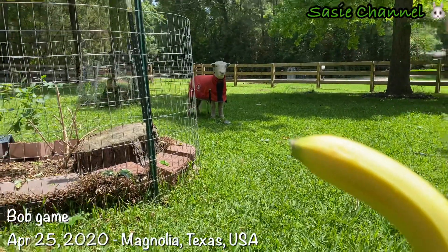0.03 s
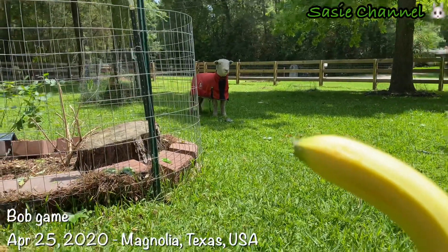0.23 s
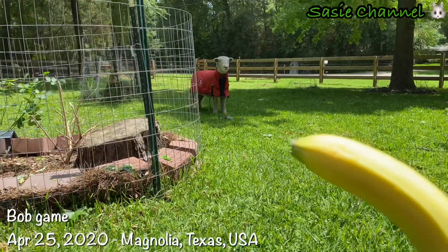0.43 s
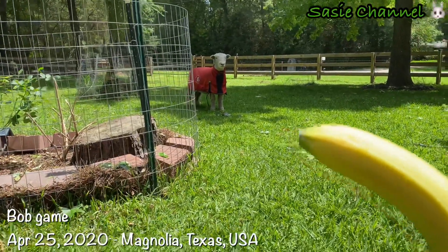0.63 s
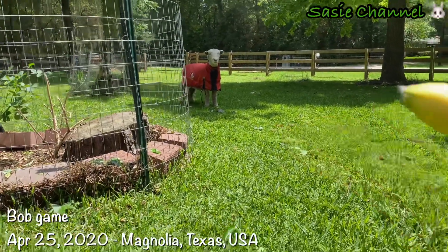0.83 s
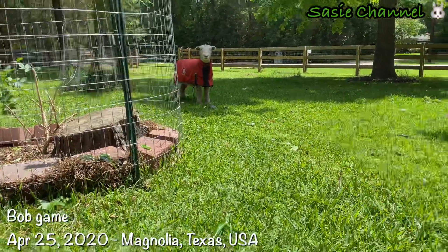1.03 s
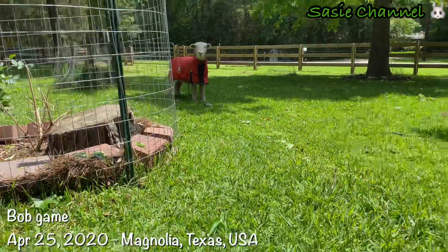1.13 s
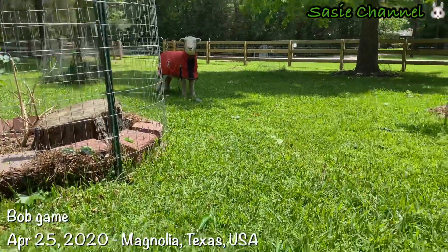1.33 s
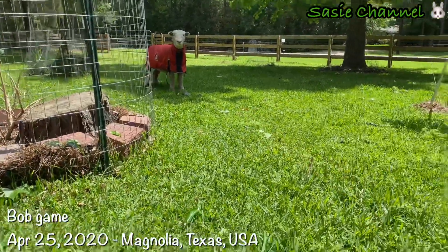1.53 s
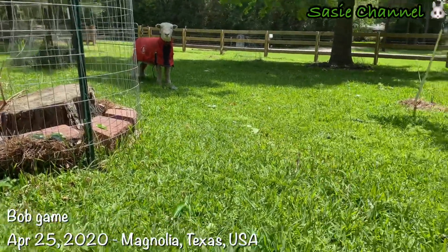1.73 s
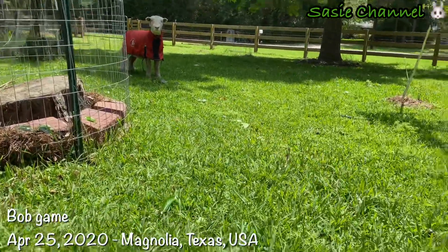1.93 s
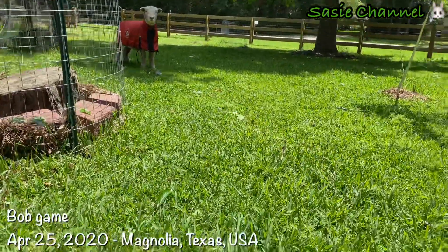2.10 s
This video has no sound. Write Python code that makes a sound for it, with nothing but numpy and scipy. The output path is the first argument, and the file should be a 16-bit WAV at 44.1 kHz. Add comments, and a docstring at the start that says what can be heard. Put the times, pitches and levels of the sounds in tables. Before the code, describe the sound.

One low sheep bleat sinks into a fading growl, with soft grass crunches nearby.

```python
"""A ram's moan in a grassy yard

Off to the left sounds one low moan, like a closed-mouth bleat or a far motor. It opens on ragged pulses,
holds a clear tone coloured by throat and nose, then sinks into a slow throbbing growl and dies away.
Close by, grass swishes and crunches and a few stalks snap. Behind it lie a faint rumble,
distant birds and a few thin, high whines."""
import sys
import numpy as np
from scipy import signal
from scipy.fft import rfft, irfft, next_fast_len
from scipy.io import wavfile
from scipy.ndimage import map_coordinates

SR = 44100
rng = np.random.default_rng(int(sys.argv[2]) if len(sys.argv) > 2 else 0)


def generate_wav(signal):
    """Clip the signal to [-1, 1] and save it as 16-bit WAV at the path in sys.argv[1]."""
    frames = np.transpose(np.atleast_2d(signal))
    scaled = np.clip(frames, -1, 1) * 32767
    pcm = np.round(scaled).astype(np.int16)
    wavfile.write(sys.argv[1], SR, pcm)


N = 95476
TIME = np.arange(N) / SR
SPLIT = np.array([[.5], [-.5]])  # shares a left-minus-right difference between the channels


def amp(db):
    """Decibels to gain."""
    return 10 ** (np.asarray(db) / 20)


def unit(x):
    """Scale to rms 1."""
    return x / np.sqrt(np.mean(x ** 2) + 1e-20)


def panned(db):
    """Stereo gains for a left-minus-right level difference."""
    return amp(db * SPLIT)


def along(points, hz):
    """Read (frequency, value) points on a log frequency axis."""
    f, v = np.transpose(points)
    return np.interp(np.log(hz + 1), np.log(f + 1), v)


def curves(rows):
    """One automation curve for each column after the time."""
    times, *columns = np.transpose(rows)
    return [np.interp(TIME, times, column) for column in columns]


def wobble(rate):
    """A smooth random curve, rate knots a second."""
    return map_coordinates(rng.standard_normal(4096), [TIME * rate], mode="wrap")


def burst(peak_s, rise_s, fall_s):
    """An envelope that swells to 1 at peak_s and dies away."""
    t = TIME - peak_s
    return np.exp(np.minimum(t / rise_s, -t / fall_s))


def filtered(x, response):
    """x through a complex frequency response."""
    size = next_fast_len(N + SR // 2)
    return irfft(rfft(x, size) * response(np.fft.rfftfreq(size, 1 / SR)), size)[..., :N]


def resonant(x, hz, width_hz):
    """x through a steep band-pass, at rms 1."""
    return unit(filtered(x, lambda f: (1j * f * width_hz / (hz * hz - f * f + 1j * f * width_hz)) ** 2))


def ringing(x, colour):
    """x rings a minimum-phase filter of the given colour with a softened top, at rms 1."""
    size = 8192
    hz = np.fft.rfftfreq(size, 1 / SR)
    gain = amp(along(colour, hz)) / (1 + (hz / colour[-1][0]) ** 2)
    cepstrum = irfft(np.log(gain + 1e-6))
    cepstrum[1:size // 2] *= 2  # folded forward, so the ring follows the hit
    cepstrum[size // 2 + 1:] = 0
    impulse = irfft(np.exp(rfft(cepstrum)))
    return unit(signal.fftconvolve(x, impulse)[:N])


def stereo(mid, side, side_db):
    """Mid and side to left and right, at rms 1."""
    return unit(np.array([mid + amp(side_db) * side, mid - amp(side_db) * side]))


def rush(colour, side_db, grain_db):
    """Grainy stereo noise of rms 1."""
    pair = rng.standard_normal((2, N)) * amp(grain_db * wobble(700))
    mid, side = filtered(pair, lambda hz: amp(along(colour, hz)))
    return stereo(mid, side, side_db)


def crackle(colour, side_db, breaks_per_s=450, share=.55):
    """Many tiny breaks of random size over a rush; share is their part of the power."""
    breaks = (rng.random(N) < breaks_per_s / SR) * rng.standard_normal((2, N))
    mid, side = [ringing(x, colour) for x in breaks]
    grains = stereo(mid, side, side_db)
    return np.sqrt(share) * grains + np.sqrt(1 - share) * rush(colour, side_db, grain_db=2.5)


def throbs(rate_hz, scatter, size_db, turbulence):
    """Uneven pulses with turbulence between them."""
    turns = np.cumsum(rate_hz * (1 + scatter * wobble(30))) / SR
    pulses = np.diff(np.floor(turns), prepend=0) * amp(size_db * wobble(39.06))
    return unit(pulses) + turbulence * rng.standard_normal(N)


def rumble():
    """A low, gently wavering outdoor bed that leans left."""
    # spectrum of the bed: f/Hz, level/dB
    colour = [(20, -42), (35, -22), (54, 19), (75, -8), (120, -18), (250, -7.5), (600, -45), (2000, -59)]
    # its slow swell: t/s, level/dB
    swell = [(0, -57), (.7, -54), (1.2, -56), (1.6, -53), (2.16, -57.5)]
    bed = rush(colour, side_db=1.0, grain_db=-4)
    return bed * amp(curves(swell)[0] + wobble(4.2)) * panned(6.5)


def bird(blur=.013):
    """A far bird whistles short glides, blurred in pitch."""
    # whistles: t/s, length/s, start f/Hz, end f/Hz, level/dB
    whistles = [(0.169, 0.17, 3070, 2820, -62.5), (0.948, 0.041, 2460, 2320, -63.5),
                (1.01, 0.047, 2500, 2770, -65.5), (1.989, 0.11, 2389, 2050, -69)]
    out = np.zeros(N)
    for start, length, start_hz, end_hz, db in whistles:
        progress = np.clip((TIME - start) / length, 0, 1)
        hz = (start_hz + (end_hz - start_hz) * progress) * (1 + blur * wobble(400))
        out += amp(db) * np.sin(np.pi * progress) * np.sin(2 * np.pi * np.cumsum(hz) / SR)
    return out


def far_calls():
    """Short calls, smeared by the trees into narrow bands of noise."""
    # calls: t/s, length/s, centre f/Hz, width/Hz, level/dB
    calls = [(1.075, 0.047, 1620, 450, -56), (1.333, 0.085, 3970, 350, -61), (1.644, .085, 1040, 128, -65),
             (1.975, 0.058, 1920, 300, -66.5), (2.133, 0.066, 1970, 350, -60.5)]
    out = np.zeros(N)
    for start, length, hz, width_hz, db in calls:
        progress = np.clip((TIME - start) / length, 0, 1)
        out += amp(db) * np.sin(np.pi * progress) * resonant(rng.standard_normal(N), hz, width_hz)
    return out


def whines(edge_s=.0022, left_lead_rad=.28):
    """Brief steady tones at the top of the treble, slightly out of phase between the channels."""
    # thin tones: t/s, length/s, f/Hz, level/dB
    tones = [(-.045, .085, 13450, -53), (.932, .085, 12462, -52), (1.015, .085, 14524, -50),
             (1.445, .085, 13450, -55)]
    out = np.zeros((2, N))
    for start, length, hz, db in tones:
        gate = np.clip(np.minimum(TIME - start, start + length - TIME) / edge_s, 0, 1)
        out += amp(db) * gate * np.sin(2 * np.pi * hz * TIME + left_lead_rad * SPLIT)
    return out


def grass_swish(gain_db=5, flutter_db=.8):
    """Blades swish in uneven, fluttering waves."""
    # spectrum of the swish: f/Hz, level/dB
    colour = [(250, 15.5), (600, 15), (1500, 7.5), (2600, 5), (4200, 7), (6300, 6), (8000, -1.5),
              (10000, 6.5), (12000, -5), (14500, 9.5), (15500, -23)]
    # its waves: t/s, level/dB before gain_db
    waves = [(0, -58.5), (.06, -59.5), (.14, -67), (.25, -60.5), (.37, -65.5), (.41, -60.5), (.47, -63),
             (.52, -56.5), (.57, -57.5), (.66, -64), (.76, -57.5), (.84, -62.5), (.93, -61), (1.02, -66.5),
             (1.1, -57.5), (1.17, -58.5), (1.245, -52.5), (1.32, -60.5), (1.37, -58), (1.43, -55),
             (1.46, -61), (1.59, -60.5), (1.635, -66), (1.68, -58.5), (1.72, -62.5), (1.82, -56.5),
             (1.885, -51), (1.915, -59), (1.96, -59.5), (2.03, -67.5), (2.1, -64), (2.16, -65)]
    blades = rush(colour, side_db=-1.5, grain_db=1.5)
    return blades * amp(curves(waves)[0] + gain_db + flutter_db * wobble(59.84))


def grass_crush():
    """Crushed grass crackles in scuffs and short, dull crunches, a little to the right."""
    # scuffs: peak t/s, level/dB, rise/s, fall/s
    scuffs = [(1.091, -60, 0.0076, 0.013), (1.245, -58.5, 0.021, 0.057), (1.41, -61, 0.035, 0.15),
              (1.69, -58.5, 0.033, 0.022), (1.868, -52, 0.037, 0.044), (2.17, -59, 0.022, .03)]
    # crunches: peak t/s, level/dB
    crunches = [(1.211, -55), (1.298, -52), (1.433, -51), (1.584, -57), (1.702, -56), (1.952, -52)]
    # spectrum of the crackle: f/Hz, level/dB
    colour = [(100, -30), (300, 2), (550, 1.5), (1100, 8), (1700, 5), (2800, 4.5), (5000, -12.5),
              (9000, -13)]
    pressure = amp(-65.5) * np.interp(TIME, (.8, 1.05), (0, 1))  # faint crushing between scuffs
    pressure += sum(amp(db) * burst(s, rise, fall) for s, db, rise, fall in scuffs)
    pressure += sum(amp(db) * burst(s, rise_s=.00069, fall_s=.0031) for s, db in crunches)
    return crackle(colour, side_db=8) * pressure * panned(-3)


def stalk_snaps(rise_s=.00069):
    """Stalks break in bright ticks of noise, each with its own treble edge."""
    # snaps: peak t/s, level/dB, decay/s, low-pass f/Hz
    snaps = [(1.481, -51, 0.0024, 12000), (1.499, -39.5, 0.0028, 12200), (1.751, -47.5, 0.0067, 10300),
             (1.795, -43.5, .003, 7540), (1.8, -43.5, 0.01, 8040)]
    # spectrum of the crack: f/Hz, level/dB
    colour = [(500, -30), (2500, -19), (4200, 5.5), (6300, 4.5), (8500, 1), (15000, 17.5)]
    crack = rush(colour, side_db=-1.5, grain_db=1.0)
    out = np.zeros((2, N))
    for peak_s, db, decay_s, top_hz in snaps:
        dulled = unit(filtered(crack, lambda f: 1 / (1 + (f / top_hz) ** 8)))
        out += amp(db) * burst(peak_s, rise_s, decay_s) * dulled
    return out


def rasp():
    """Quick, ragged pulses give the moan its rough opening."""
    # envelope of the rasp: t/s, level/dB
    envelope = [(0, -29), (.06, -31), (.15, -30.5), (.195, -35), (.235, -31), (.28, -48), (.335, -30.5),
                (.38, -48), (.7, -41.5), (.8, -47.5), (1.2, -50.5), (1.5, -84)]
    # the resonances its pulses ring: f/Hz, level/dB
    colour = [(40, -22), (75, -10), (105, 0), (160, -0.5), (210, -8), (265, 1.5), (350, 2.5), (460, -19.5),
              (530, -12), (580, 0), (670, -15), (1100, -28), (1600, -104)]
    pulses = throbs(rate_hz=44, scatter=.2, size_db=3.0, turbulence=1.0)
    return ringing(pulses, colour) * amp(curves(envelope)[0])


def growl(rate_hz=31.5, slowing_hz_per_s=5.5, darken_s=(.66, 1.32)):
    """The moan's tail throbs, ever slower and darker."""
    # envelope of the growl: t/s, level/dB
    envelope = [(.74, -58), (.79, -39.5), (.86, -38), (.95, -41), (1.1, -41), (1.22, -44), (1.35, -45),
                (1.52, -46.5), (1.67, -47), (1.76, -56.5), (1.94, -55), (2.03, -53.5), (2.16, -61)]
    # its early resonances: f/Hz, level/dB
    early = [(35, -22), (70, -6.5), (110, -3), (170, -1.5), (240, -16.5), (300, -12), (360, -4.5),
             (450, -21.5), (600, -27), (1000, -61)]
    # its late, darker resonances: f/Hz, level/dB
    late = [(30, -41.5), (60, 4), (90, -4.5), (150, -3), (220, -14), (350, -15), (500, -26.5),
            (1000, -60.5)]
    pulses = throbs(rate_hz - slowing_hz_per_s * TIME, scatter=.0293, size_db=.5, turbulence=.5)
    dark = np.interp(TIME, darken_s, (0, 1))
    tail = (1 - dark) * ringing(pulses, early) + dark * ringing(pulses, late)
    return tail * amp(curves(envelope)[0])


def hoarseness(phase, nasal_hz=1930, width_hz=170, flutter_db=2.5):
    """Air puffs once a cycle through the throat and, with the buzz, sets the nasal resonance ringing."""
    # uneven bursts of nasal ring: t/s, level/dB
    nasal_bursts = [(0, -70), (.05, -61), (.21, -71), (.24, -58), (.3, -63), (.335, -57), (.358, -67),
                    (.375, -52), (.404, -64), (.434, -56), (.485, -68), (.505, -60), (.536, -71),
                    (.564, -62), (.59, -69), (.654, -59), (.71, -75), (.75, -65), (.78, -73), (.805, -61),
                    (.87, -77), (1.2, -100)]
    # envelope of the hoarse air: t/s, level/dB
    breath_envelope = [(0, -56), (.19, -57), (.27, -50), (.36, -50), (.47, -56), (.56, -55), (.75, -56),
                       (.82, -65), (1.0, -76), (1.3, -100)]
    # its spectrum: f/Hz, level/dB
    breath_colour = [(380, -32), (500, -17), (700, -1), (880, 2), (1050, 4), (1300, -7), (1500, -6),
                     (1750, -24), (2300, -26), (3000, -67)]
    air = rng.standard_normal(N) * (1 + np.cos(phase))
    buzz = sum(np.cos(k * phase) for k in range(9, 16))
    nasal = unit(resonant(buzz, nasal_hz, width_hz) + resonant(air, nasal_hz, width_hz))
    nasal *= amp(curves(nasal_bursts)[0] + flutter_db * wobble(109.7))
    breath = unit(filtered(air, lambda f: amp(along(breath_colour, f))))
    return nasal + breath * amp(curves(breath_envelope)[0])


def overtones(phase, pitch_hz, closing_s=(.54, .46), flutter_db=2, ragged_rad=.02):
    """Harmonics 4 to 10 slide through the throat's resonances, which narrow as the mouth closes."""
    # broad resonance near 1 kHz, mouth open: f/Hz, gain/dB
    throat_open = [(550, -4), (720, -4), (900, -3), (1090, -4), (1270, -8), (1450, -16), (1700, -21),
                   (2300, -36), (3000, -70)]
    # narrower peaks, mouth closing: f/Hz, gain/dB
    throat_closed = [(500, -6), (630, -2), (790, -11), (930, -2), (1000, -2), (1120, -13), (1300, -15),
                     (1600, -26), (3000, -70)]
    # drive of each harmonic into the throat: t/s, level/dB
    drive = [(0, -57), (.19, -58), (.26, -52), (.34, -52), (.385, -46), (.45, -46), (.5, -49), (.56, -49.5),
             (.72, -51), (.8, -64), (1.0, -78), (1.3, -103)]
    closed = np.interp(TIME, closing_s, (0, 1))
    out = np.zeros(N)
    for k in range(4, 11):
        db = (1 - closed) * along(throat_open, k * pitch_hz) + closed * along(throat_closed, k * pitch_hz)
        gain = np.sqrt(2) * amp(db + flutter_db * wobble(58.6))
        out += gain * np.sin(k * (phase + ragged_rad * wobble(150)))
    return out * amp(curves(drive)[0])


def voice(jitter=.006, shake_rad=.16, shimmer_db=.7, shake_db=3.5):
    """Three clear partials that shake where the moan is gruff, with overtones and hoarseness on top."""
    # glide of the second partial, an octave above the fundamental: t/s, f/Hz
    glide = [(0, 354), (.08, 360), (.16, 342), (.2, 346), (.255, 367), (.295, 363), (.325, 352),
             (.355, 364), (.41, 362), (.475, 336), (.52, 327), (.57, 325), (.65, 315), (.72, 302),
             (.8, 273), (.9, 239), (1.0, 205), (1.11, 165), (1.27, 151), (1.4, 131), (1.9, 89)]
    # how hard the partials shake: t/s, roughness/0-1
    roughness = [(0, .8), (.2, .7), (.27, .4), (.325, .9), (.37, .2), (.44, .2), (.48, .5), (.55, .3),
                 (.7, .35), (.78, .7), (.86, 1)]
    # envelopes of the partials: t/s, first level/dB, second level/dB, third level/dB
    envelopes = [(0, -29, -37, -41), (.08, -86, -39.5, -43.5), (.12, -43, -41, -60), (.19, -42, -42.5, -52),
                 (.235, -45, -32, -41), (0.284, -46, -28, -30.5), (.33, -48, -32, -43.5),
                 (.39, -41, -27, -29.5), (.43, -46, -29, -33), (.48, -39.5, -32, -48.5),
                 (.56, -42.5, -26.5, -45), (0.629, -38.5, -31.5, -54), (.73, -42.5, -37, -47.5),
                 (.78, -60, -44.5, -48), (.91, -65, -44.5, -67), (1.0, -64, -47.5, -69),
                 (1.13, -67, -45.5, -80), (1.4, -52, -57, -96), (1.9, -61.5, -59.5, -103)]
    # the third partial breaks up as it fades: t/s, noisy share/0-1
    breakup = [(.44, .03), (.5, .55), (.6, .8)]
    pitch_hz = curves(glide)[0] / 2
    rough, = curves(roughness)
    phase = 2 * np.pi * np.cumsum(pitch_hz * (1 + jitter * wobble(69.1))) / SR
    shaken = phase + shake_rad * rough * wobble(110)
    depth_db = shimmer_db + shake_db * rough ** 2
    partials = [np.sqrt(2) * amp(depth_db * wobble(70)) * np.sin(k * shaken) for k in (1, 2, 3)]
    broken, = curves(breakup)
    noise_band = wobble(120) * np.sin(3 * phase) + wobble(120) * np.cos(3 * phase)
    partials[2] = np.sqrt(1 - broken) * partials[2] + np.sqrt(broken) * noise_band
    clear = sum(amp(db) * partial for db, partial in zip(curves(envelopes), partials))
    return clear + overtones(shaken, pitch_hz) + hoarseness(phase)


def from_left(x):
    """The sound arrives on the left first; its balance varies with frequency."""
    # head start of the left channel: f/Hz, phase/rad
    lead = [(40, 0), (105, .55), (165, 1.05), (240, 1.35), (350, 1.6), (550, 2.3), (720, 2.7), (1000, 2.55),
            (1270, 3.2), (1450, 3.9), (1950, 5.3), (3000, 6.3)]
    # stereo balance: f/Hz, left minus right level/dB
    balance = [(60, -2.8), (200, -2.4), (380, 1), (550, 1.3), (1290, 3), (2000, -4)]
    return filtered(x, lambda hz: panned(along(balance, hz)) * np.exp(1j * SPLIT * along(lead, hz)))


def scene():
    """The moan from the left, the grass close by, the yard all round."""
    moan = from_left(voice() + rasp() + growl())
    grass = grass_swish() + grass_crush() + stalk_snaps()
    yard = bird() + rumble() + far_calls() + whines()
    return moan + grass + yard


def record(dry):
    """A brick-wall low-pass takes off the very top of the treble."""
    return filtered(dry, lambda hz: hz < 15600)


dry = scene()
out = record(dry)
generate_wav(out)
```